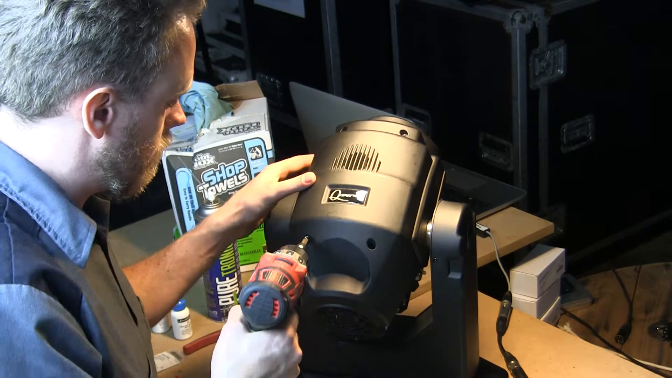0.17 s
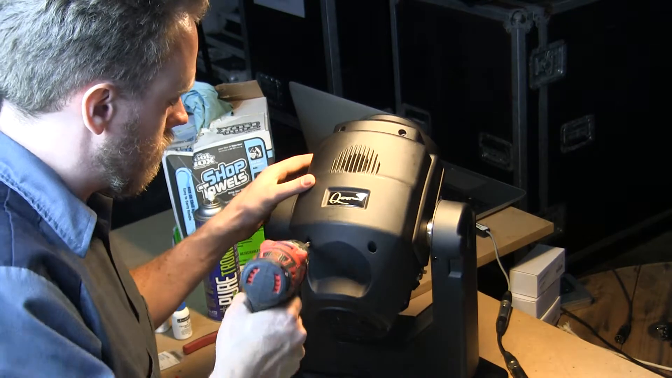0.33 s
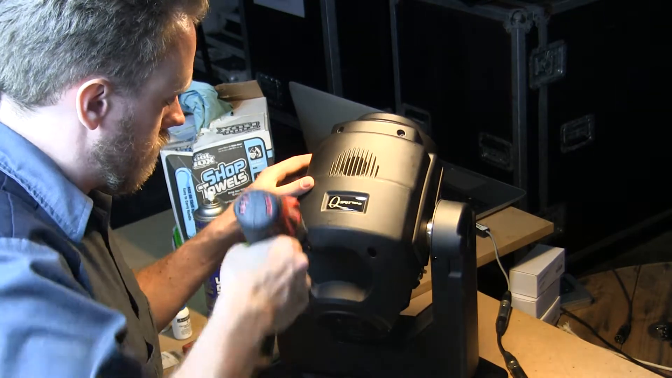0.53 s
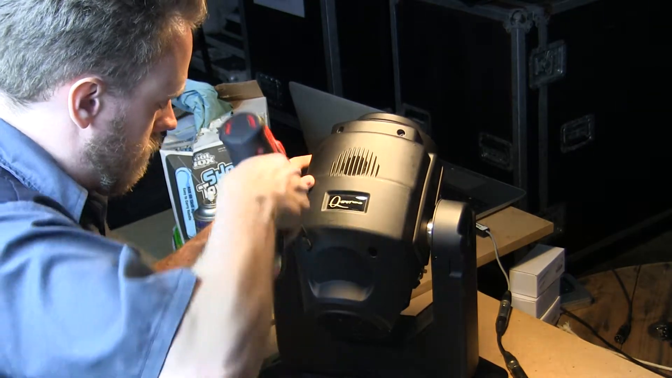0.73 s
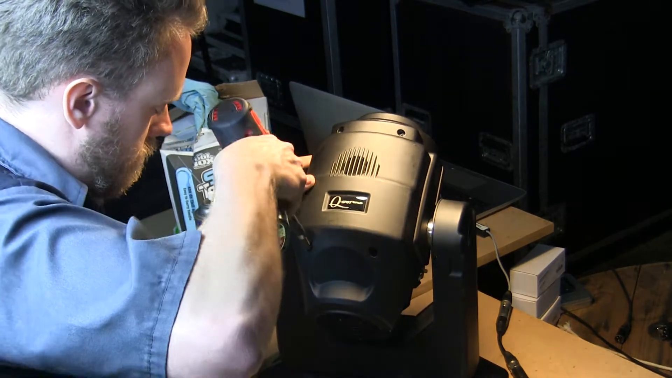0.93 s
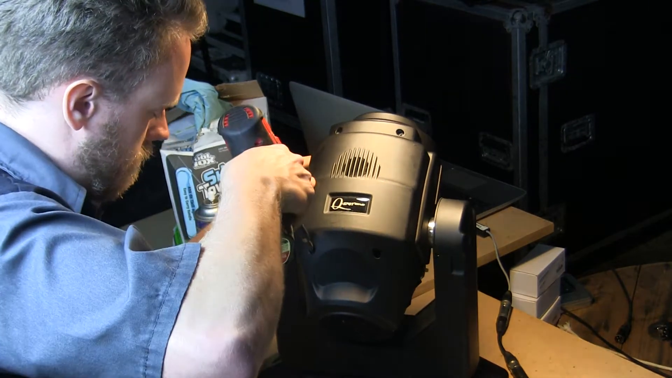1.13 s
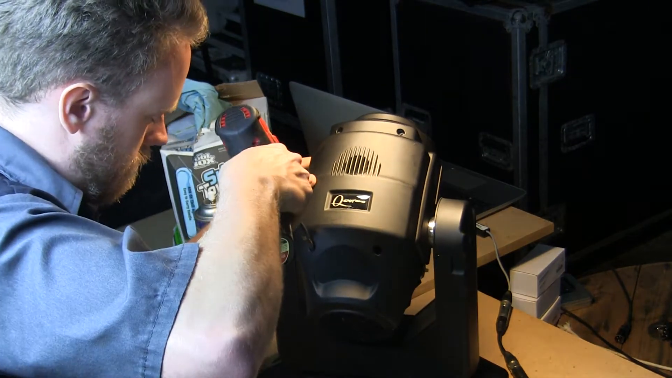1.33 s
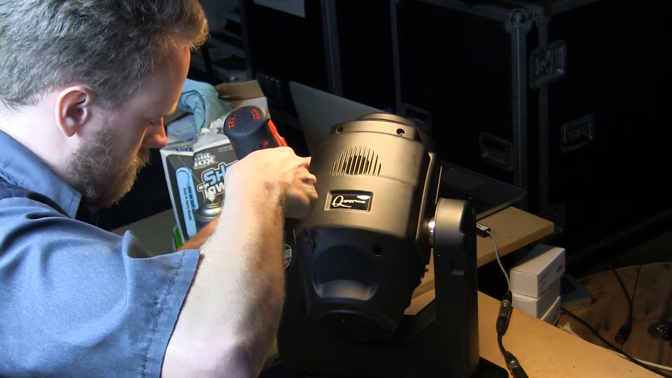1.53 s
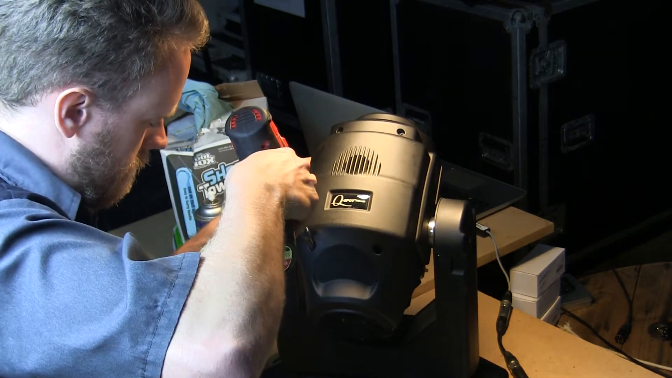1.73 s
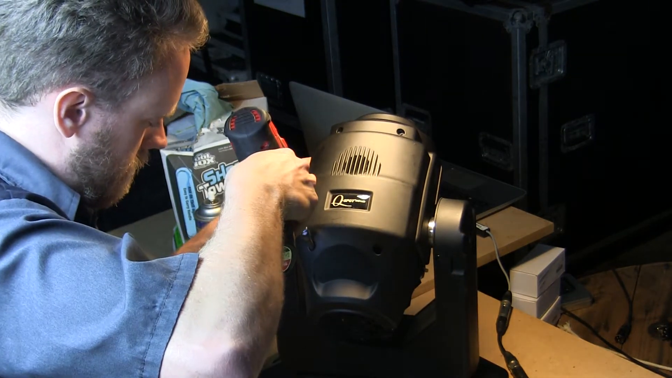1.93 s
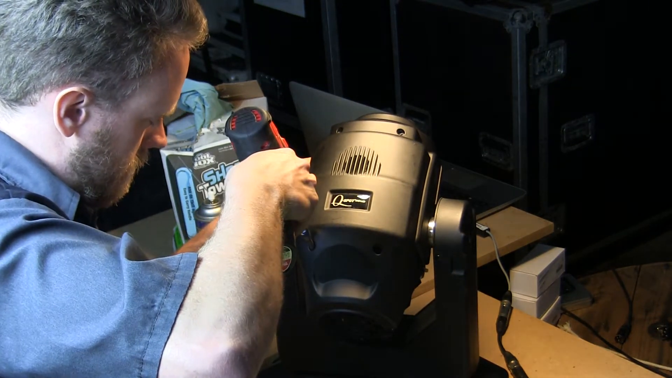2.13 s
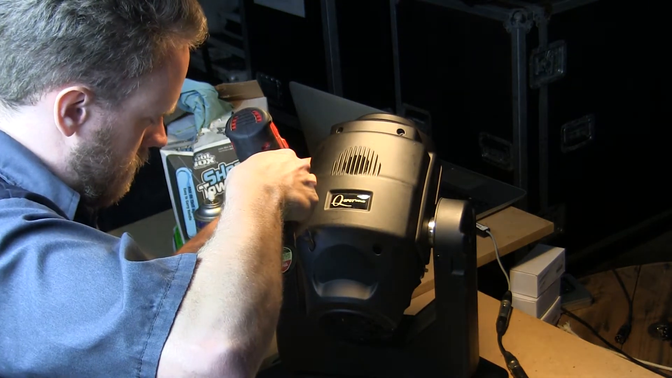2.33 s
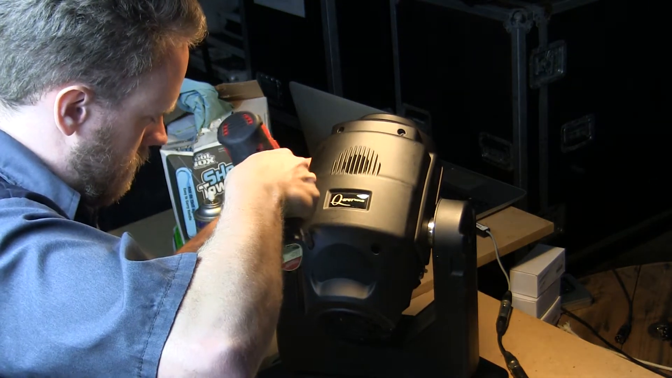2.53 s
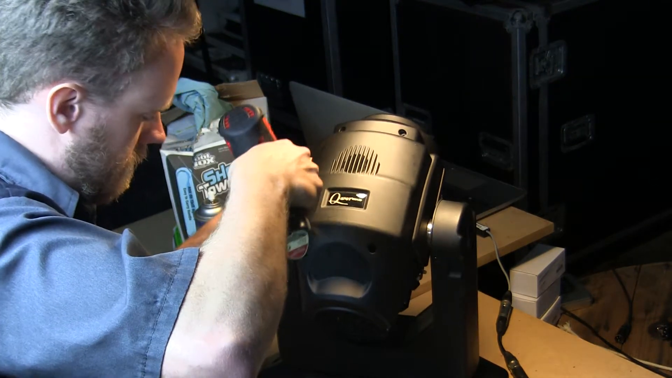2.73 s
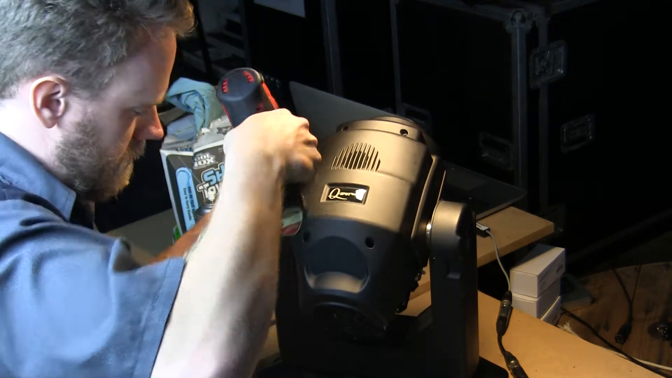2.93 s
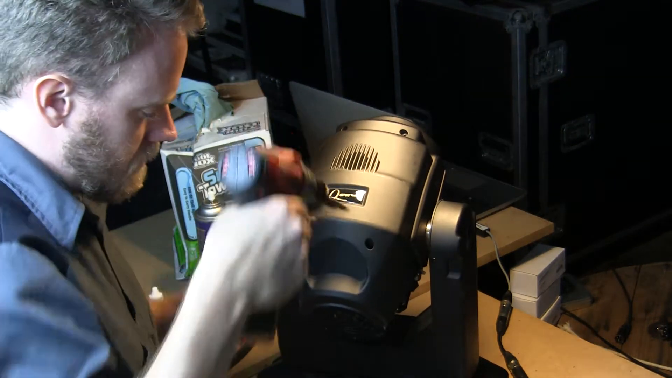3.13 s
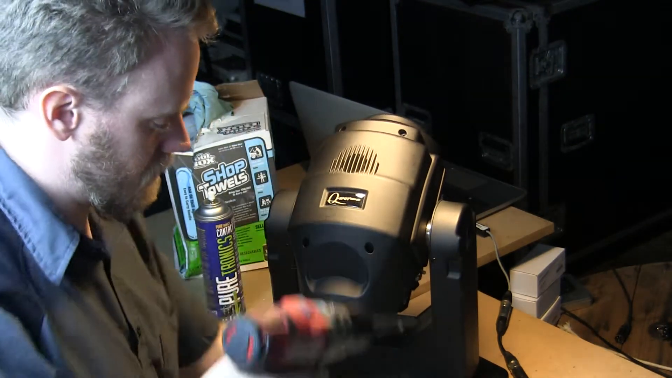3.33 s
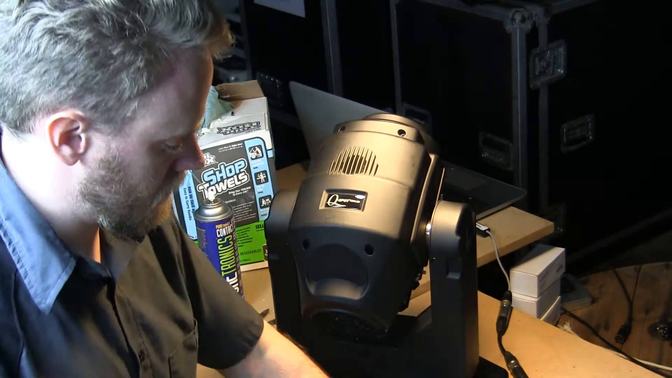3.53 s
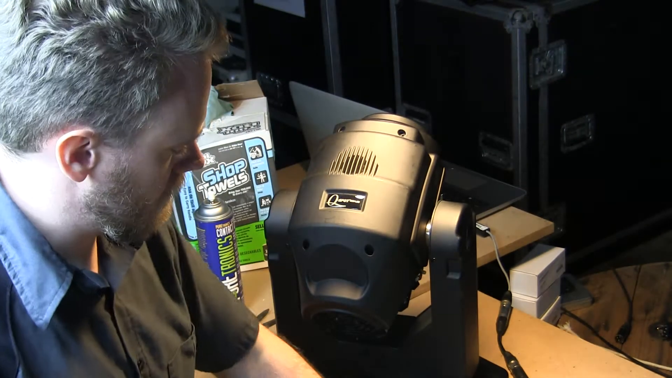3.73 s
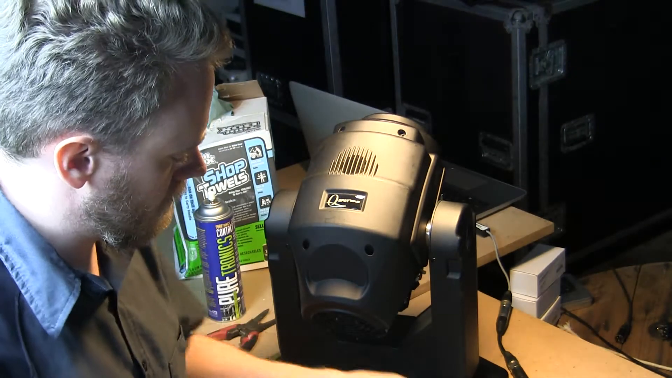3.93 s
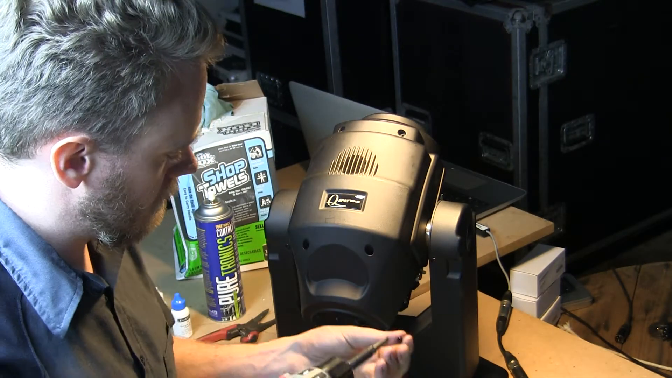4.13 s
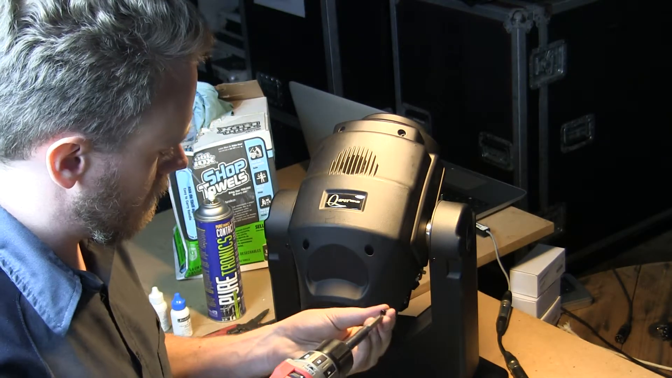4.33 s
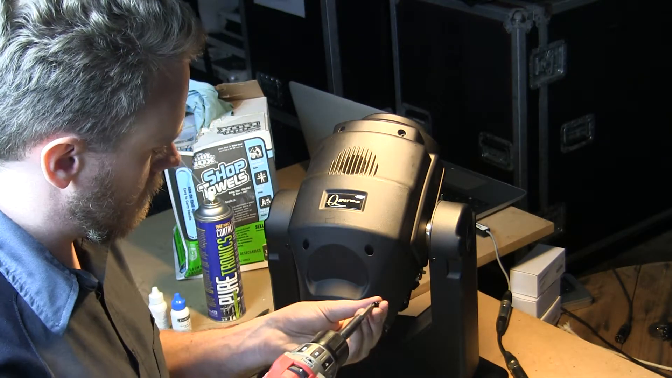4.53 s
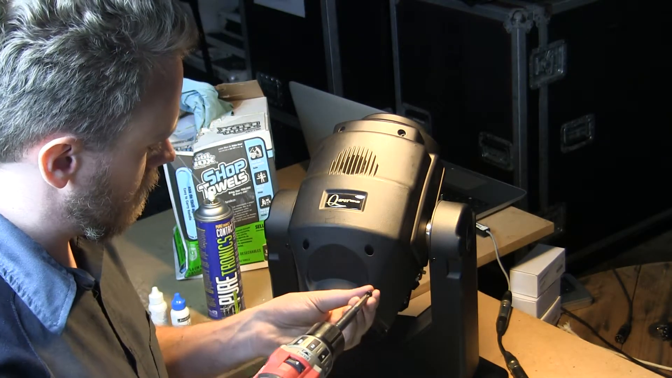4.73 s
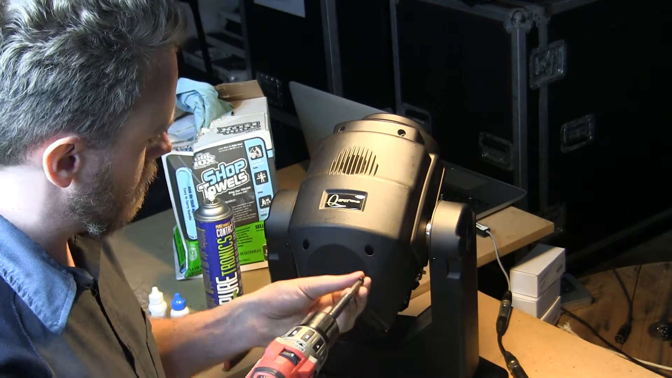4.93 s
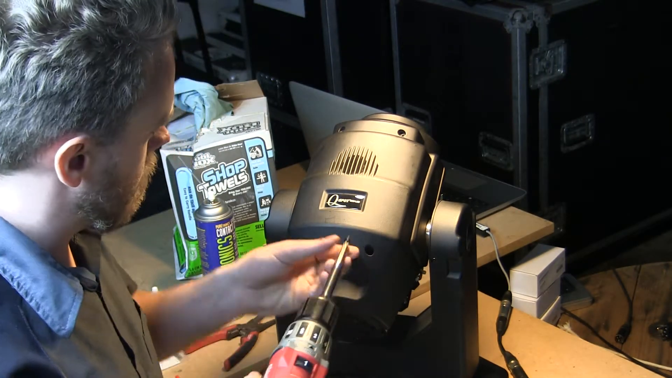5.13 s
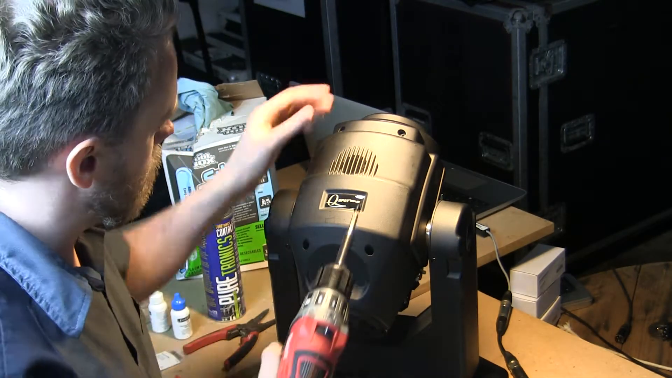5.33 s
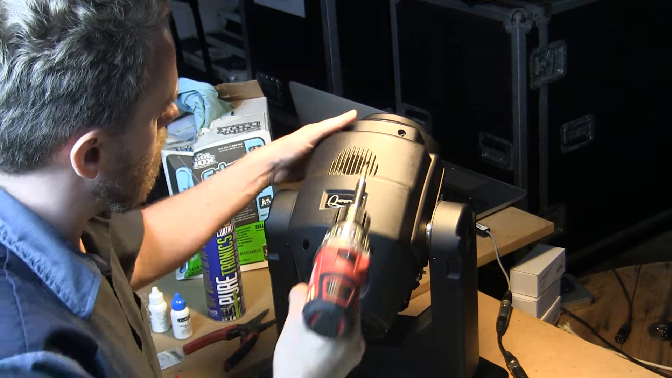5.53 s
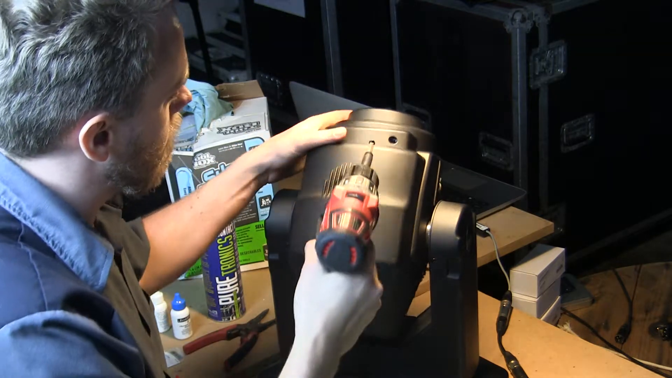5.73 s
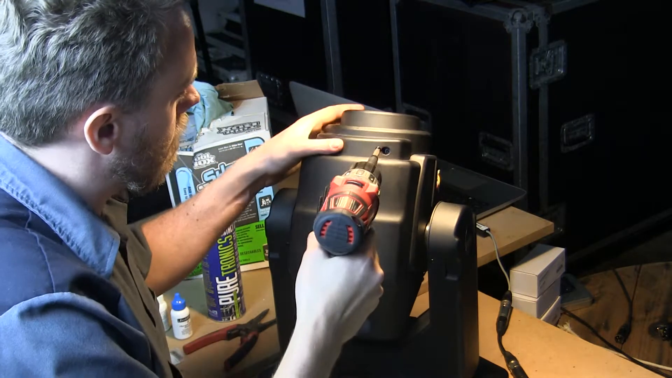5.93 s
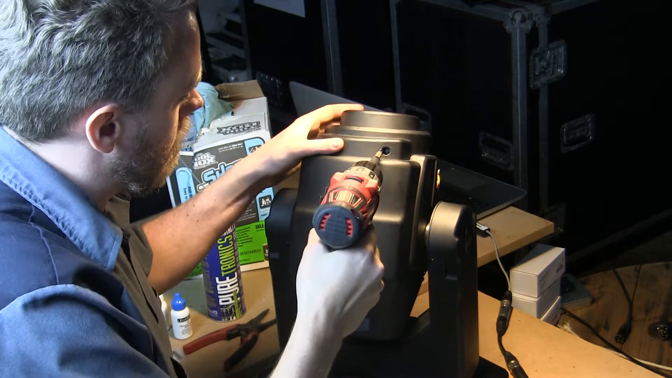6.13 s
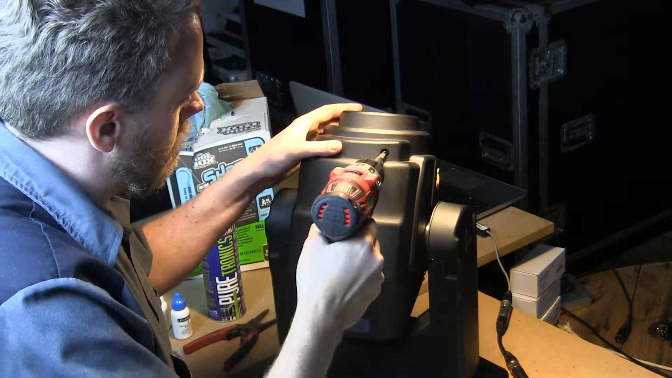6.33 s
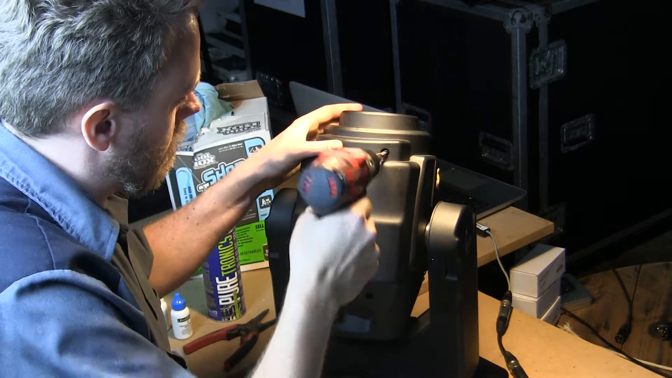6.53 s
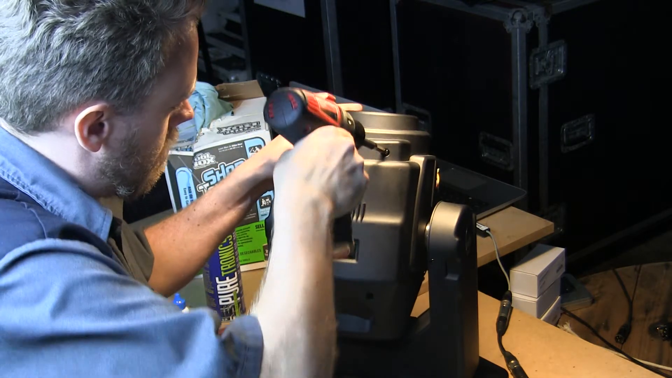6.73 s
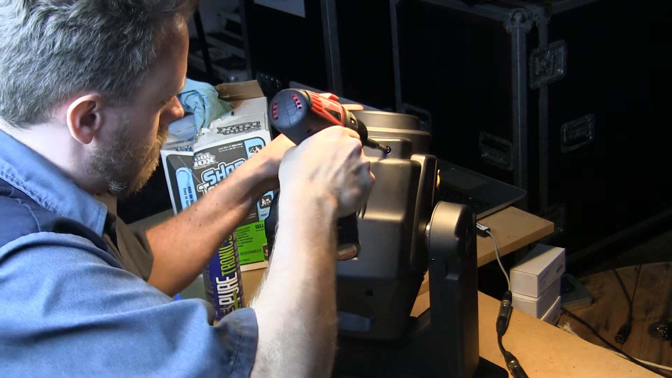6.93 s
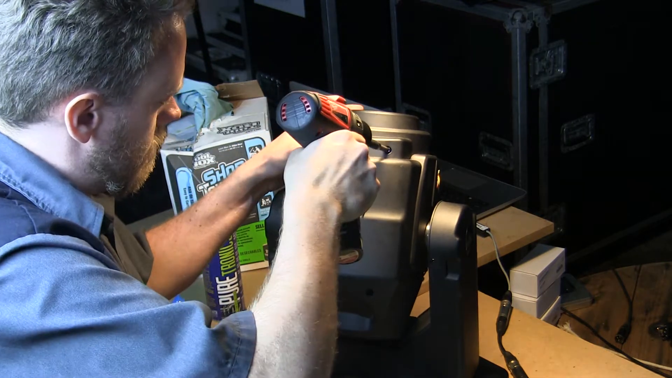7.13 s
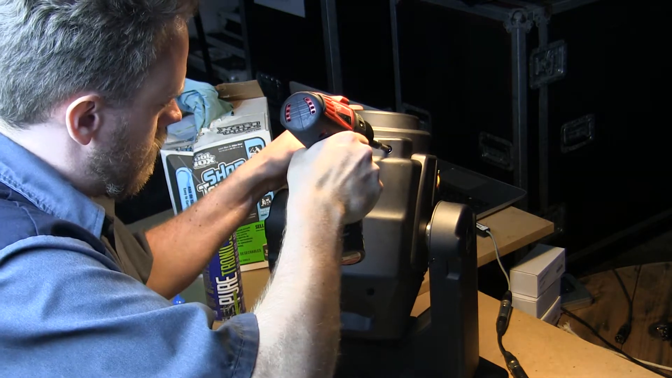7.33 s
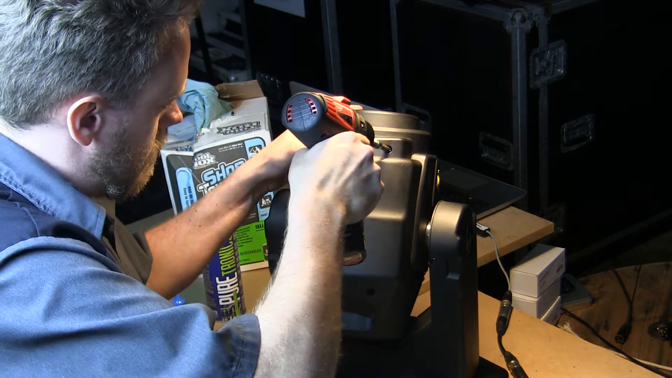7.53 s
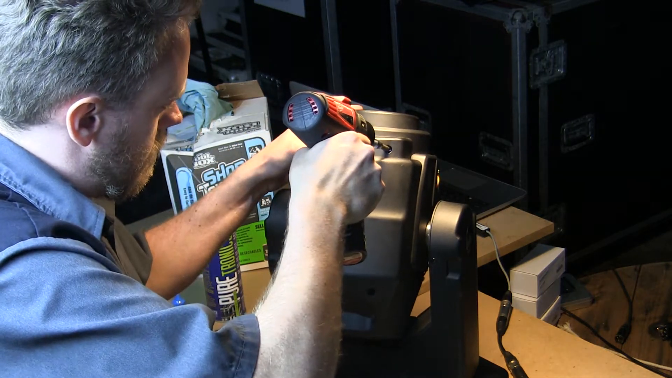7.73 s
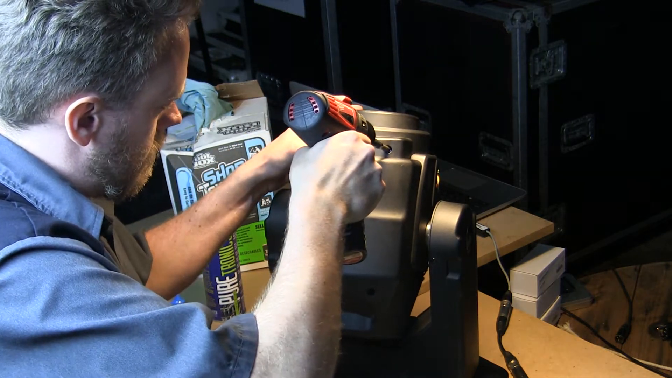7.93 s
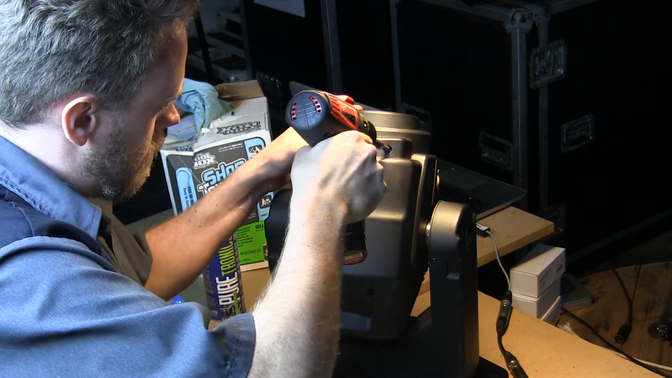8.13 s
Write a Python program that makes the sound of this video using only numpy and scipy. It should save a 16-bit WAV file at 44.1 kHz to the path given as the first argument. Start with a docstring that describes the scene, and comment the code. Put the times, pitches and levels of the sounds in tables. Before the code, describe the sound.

A close stereo microphone in a workshop hears soft room hum and drifting scuffs of movement. Faint knocks on a hollow plastic housing come around 0.4-0.8 s, with small ticks just before 1.2 s. A cordless drill then spins up almost instantly, with a brief electronic whistle, to a bright buzzing whine over airy whirr. From about 2.55 s its clutch slips, ratcheting nearly fifty clicks a second as the pitch sags slightly; it brakes abruptly near 2.8 s with last weak clicks. A double clack follows at 3.15 s, then dull wooden thumps and cloth rustles from 3.4 to 4 s. Quieter rustling continues until plastic knocks at 5.6-6.1 s and a sharper cluster at 6.6 s. At 6.9 s the drill whines up again, with firm knocks around 7.2-7.3 s, and runs steadily to the end. Short reverberation surrounds it.

```python
"""In a workshop, a cordless drill spins up twice near the microphone, and at the end of the first run its clutch ratchets.
The drill is multiples of its shaft speed over noise that throbs once a turn; each clutch slip is a ringing click.
Around the runs hands knock a plastic housing and set things down on a wooden bench: noisy pushes ring modes,
and low thumps also lend bass to the ratchet and the knocks. Puffs of noise rustle, noise shuffles and hums behind,
and scattered dying taps make the room's reverberation."""
import sys
import numpy as np
from scipy import signal
from scipy.io import wavfile
from scipy.ndimage import uniform_filter1d

SR = 44100
rng = np.random.default_rng(int(sys.argv[2]) if len(sys.argv) > 2 else 0)


def digitize_waveform(pressure):
    """Quantize a signal to 16-bit integers and store it at the path in sys.argv[1].

    Rows of a 2-D input are taken as channels; values are limited to [-1, 1].
    """
    field = np.atleast_2d(pressure).T
    bounded = np.clip(field, -1, 1)
    quanta = np.round(bounded * 32767).astype(np.int16)
    wavfile.write(sys.argv[1], SR, quanta)


N = 360738

# drill runs: trigger pulled t/s, let go t/s, relative whirr level/dB, treble shelf level/dB
RUN_TABLE = [(1.17, 2.763, -23, 0), (6.92, 9, -21.5, -2.5)]
# last clutch slips as the chuck coasts to rest: t/s, relative level/dB
COASTING_SLIPS = [(2.854, -9.5), (2.8853, -11)]
# modes of the plastic housing: f/Hz, width f/Hz, relative level/dB
HOUSING_MODES = [(305, 11, -7), (348, 36, -7.5), (443.5, 29, -3), (561, 130, 8.5), (724, 88, 2),
                 (938, 230, 7.5), (1295, 330, 7), (1890, 620, 5.5), (2880, 800, -4.5), (3700, 490, -14),
                 (5560, 2000, -13.5)]

PINION, RING = 24, 15  # multiples of the shaft at which the gears whine
FIRST_SLIP_S = 2.5597


def gain_of(db):
    """Decibels to amplitude."""
    return 10 ** (np.asarray(db) / 20)


def evened(x):
    """Scales to rms 1."""
    return x / np.sqrt(np.mean(x ** 2) + 1e-20)


def read(points, hz):
    """Reads a spectrum on a log-frequency axis."""
    f, value = np.transpose(points)
    return np.interp(np.log(hz + 1), np.log(f + 1), value)


def add(mix, s, sound):
    """Mixes a sound in at time s."""
    part = mix[..., round(s * SR):][..., :sound.shape[-1]]
    part += sound[..., :part.shape[-1]]


def wander(per_s, size):
    """Slow chance of about rms 1: random knots, smoothed twice; higher per_s drifts faster."""
    knots = rng.standard_normal(int(size / SR * 100) + 9)  # 100 a second
    width = max(round(50 / per_s), 1)
    smooth = uniform_filter1d(uniform_filter1d(knots, width), width)
    return np.interp(np.arange(size) * 100 / SR, np.arange(len(knots)), evened(smooth))


def hiss(spectrum, patchy_db):
    """Stereo noise of rms 1 with a given spectrum, drifting patches and partly shared left and right."""
    # left-right likeness: f/Hz, share (1 = same)
    likeness = [(60, 0.94), (500, 0.94), (1800, 1), (6000, 0.84)]
    frames, hz = N // 256 + 5, np.fft.rfftfreq(1024, 1 / SR)
    a, b, c, d, patches = rng.standard_normal((frames, 513, 5)).T
    patches = evened(uniform_filter1d(uniform_filter1d(patches, 10, 0), 10, 1))
    same = np.clip(read(likeness, hz), -1, 1)[:, None]
    left = a + 1j * b
    right = same * left + np.sqrt(1 - same ** 2) * (c + 1j * d)
    z = np.array([left, right]) * gain_of(read(spectrum, hz)[:, None] + patchy_db * patches)
    return evened(signal.istft(z, nperseg=1024, noverlap=768)[1][:, :N])


def blow(modes, db, hard_db, rattle_s, low_hz, rise_s, crack=3.9, high_hz=10000):
    """A push and rattle ring a body; hardness (dB/octave) favours upper modes, a slow rise has less crack."""
    t = np.arange(SR // 3) / SR
    hz, width, mode_db = np.transpose(modes)[:, :, None]
    spot, shift = rng.standard_normal((2, len(modes), 1))  # each blow lands elsewhere
    level = np.sqrt(width) * gain_of(mode_db + 1.2 * spot + hard_db * np.log2(hz / 700))
    ringing = np.exp(-np.pi * width * t) * np.sin(2 * np.pi * hz * (1 + 0.011 * shift) * t)
    body = (level * ringing).sum(0)
    rise_s = max(rise_s, 1 / 1500)
    rattle = (1 - np.exp(-t / rise_s)) * np.exp(-t / max(rattle_s, .001))
    sharp = crack / (1500 * rise_s) * gain_of(min(hard_db, 0)) * np.exp(-t / 0.0011)
    push = rng.standard_normal(len(t)) * (rattle + sharp)
    band = signal.butter(3, [low_hz, high_hz], "band", fs=SR)
    out = signal.lfilter(*band, signal.fftconvolve(push, body)[:len(t)])
    return gain_of(db) * out / abs(out).max()


def shell_db(hz):
    """The drill shell lifts whatever passes its resonances."""
    # shell resonances: f/Hz, width f/Hz, lift level/dB
    resonances = [(690, 160, 26), (7700, 600, 17), (11800, 900, 9)]
    return sum(db / (1 + ((hz - f) / width) ** 2) for f, width, db in resonances)


def orders(own_db):
    """Relative levels of the shaft multiples; the armature slots lift every third."""
    # multiples of the shaft with a level of their own, some loud, some faint: multiple (a count)
    own_level = [3, 6, 7, 9, 12, 20, 21, 22, 23, 32, 36, 39, 40, 45]
    k = np.arange(1, 50)
    db = np.where(k < RING + 3, -31, -24.5) + 4.5 * (k % 3 == 0)
    db = db + 1.5 * rng.standard_normal(len(k))
    db[np.array(own_level) - 1] = own_db
    return db


def drill(run, own_db, air):
    """Multiples of the shaft speed sing over a whirr that throbs once a turn."""
    # gear whines, flaring through resonances and as the drill is tilted and loaded:
    # t/s, pinion level/dB, ring gear level/dB
    whines = [(1.2, -60, -59), (1.27, -37, -41), (1.31, -35, -34), (1.36, -34, -38), (1.4, -20.5, -33),
              (1.43, -32, -48), (1.48, -19, -33), (1.52, -38, -38), (1.59, -26.5, -32), (2.1, -24.5, -28.5),
              (2.35, -25, -33.5), (2.5, -32, -36), (2.54, -25, -34), (2.73, -29.5, -34), (6.96, -58, -61),
              (7.05, -35, -40), (7.09, -36, -37), (7.13, -17, -43), (7.16, -31, -42), (7.2, -29, -37),
              (7.29, -23, -30), (7.35, -23, -36), (7.62, -27, -37.5), (8.0, -21.5, -32), (8.18, -30, -31)]
    # free speed of the motor shaft, sagging under load: t/s, f/Hz
    shaft = [(1.6, 315), (2.3, 314.5), (2.53, 313.3), (2.6, 304.2), (2.8, 305), (7.3, 315.6), (7.6, 315.7),
             (8.18, 314.8)]
    spin_up_s, already_turning_s = .062, .005  # time constant; the shaft moves when first heard
    quiet_start_db, swell_s = -12.5, 0.045
    brake_db_per_s, whine_cut_db_per_s = 212, 502  # the cut adds to the brake: whines stop with the current
    pulled, let_go, run_db, treble_db = run
    t = np.arange(pulled, min(let_go + 0.25, N / SR), 1 / SR)
    size = len(t)

    speed = 1 - np.exp(-(t - pulled + already_turning_s) / spin_up_s)
    hz = np.interp(t, *np.transpose(shaft)) * speed
    since_let_go = np.maximum(t - let_go, 0)
    braked = gain_of(-brake_db_per_s * since_let_go) * np.minimum((t - pulled) / 0.019, 1)
    slipping = np.clip((t - FIRST_SLIP_S) / 0.04 + 1, 0, 1) * (t < COASTING_SLIPS[-1][0] + 1)
    swell = np.exp(-((t - pulled) / swell_s) ** 2)
    whirr_db = run_db + quiet_start_db * swell + 6 * slipping

    broken_db = np.minimum(10 * np.sqrt(1 - speed), 5.0)  # tones break up below full speed
    cut_db = whine_cut_db_per_s * since_let_go
    s, *columns = np.transpose(whines)
    pinion_db, ring_db = (np.interp(t, s, c) for c in columns)
    pinion_db = pinion_db + (2.6 * slipping + 0.28 * broken_db) * wander(30, size) - cut_db
    ring_db = ring_db + 1.66 * wander(12, size) - cut_db
    ring_db = ring_db - 4.5 * slipping + .4 * broken_db * wander(30, size)

    unsteady = (0.00034 + .004 * slipping) * wander(40, size)  # the slipping clutch jolts the shaft
    turn = 2 * np.pi * np.cumsum(hz * (1 + unsteady)) / SR
    blurred_db = 9.0 * slipping + 56 * (1 - hz / hz.max())  # tones stand out only at a steady speed
    lines = np.zeros((2, size))
    for k, db in enumerate(orders(own_db), 1):
        lift_db = np.repeat(shell_db(k * hz[::64]) - shell_db(k * hz.max()), 64)[:size]
        level_db = whirr_db - 3.5 + db + lift_db
        level_db = level_db + 1.85 * wander(6.6, size) + 1.9 * wander(25, size)
        level_db = level_db - broken_db * abs(wander(30, size)) - blurred_db * min(k / 10, 1)
        level_db = {PINION: pinion_db, RING: ring_db}.get(k, level_db)
        phase = rng.uniform(0, 2 * np.pi) + 0.02 * rng.standard_normal((2, 1))
        pan_db = np.array([[1], [-1]]) * (1.3 if k == RING else .5 * rng.standard_normal())
        lines += np.sqrt(2) * gain_of(level_db + pan_db) * np.cos(k * turn + phase)

    start = round(pulled * SR)
    whirr = air[:, start:start + size]
    treble = signal.lfilter(*signal.butter(1, 4000, "high", fs=SR), whirr)
    treble_db = treble_db - 6.0 * swell  # the fan's hiss wakes last
    whirr = (whirr + (gain_of(treble_db) - 1) * treble) * (1 + 0.12 * np.cos(turn))
    return pulled, (lines + gain_of(whirr_db - 2.5) * whirr) * braked * gain_of([[.7], [-.7]])


def drill_runs():
    """Both runs of the drill, drawing on one noise of fan, brushes and gears."""
    # whirr of fan, brushes and gears: f/Hz, relative level/dB per Hz
    whirr_spectrum = [(90, -59), (200, -23), (320, -14), (840, -12), (1900, -3.5), (2600, -5.5),
                      (4200, -13.5), (6000, -10.5), (7500, -11.5), (9500, -19.5), (11800, -14),
                      (14000, -24), (16000, -24)]
    # multiples with a level of their own, one row a run as the drill faces another way: level/dB in each column
    own_levels = [
        [-16, -8, -15, -10, -16, -21, -15, -12, -16, -24, -8, -21, -18, -18],
        [-18, -16, -14, -7, -12, -10, -14, -12, -15, -18, -10, -13, -30, -20],
    ]
    motor, air = np.zeros((2, N)), hiss(whirr_spectrum, patchy_db=1.0)
    for run, own_db in zip(RUN_TABLE, own_levels):
        add(motor, *drill(run, own_db, air))
    return motor


def switch():
    """The half-pulled trigger whistles: the speed control chops the current at a steady rate."""
    t = np.arange(SR // 8) / SR
    level = np.minimum(t / 0.004, 1) * gain_of(-27 - 350 * t)  # 4 ms rise, 350 dB/s fade
    return level * np.sin(2 * np.pi * 1880 * t)


def click(db):
    """One tooth drops: the clutch modes ring cleanly, a little detuned each time."""
    # clutch modes: f/Hz, width f/Hz, relative level/dB, later start t/s
    clutch = [(3050, 300, 0, 0), (1750, 160, 0, .0012), (5500, 600, -14, 0)]
    t = np.arange(SR // 50) / SR
    hz, width, mode_db, late_s = np.transpose(clutch)[:, :, None]
    spot, shift = rng.standard_normal((2, len(clutch), 1))
    u = np.maximum(t - late_s, 0)
    shape = (1 - np.exp(-u / .0005)) * np.exp(-np.pi * width * u)
    ringing = shape * np.sin(2 * np.pi * hz * (1 + 0.038 * shift) * u)
    return (gain_of(db + mode_db + 1.8 * spot) * ringing).sum(0)


def ratchet():
    """Each slip clicks the clutch and shakes the housing through the screw, weaker once the trigger is let go."""
    slips, gap_s, jitter_s = 12, .02125, .0004
    fade_db_per_s = 198
    out = np.zeros(N)
    at = FIRST_SLIP_S + gap_s * np.arange(slips) + jitter_s * rng.standard_normal(slips)
    level_db = 0.2 - fade_db_per_s * np.maximum(at - RUN_TABLE[0][1], 0)
    for s, db in [*zip(at, level_db), *COASTING_SLIPS]:
        add(out, s, click(db - 5.0))
        add(out, s, blow(HOUSING_MODES, db - 11.5, -9.0, 0.022, 230, 0.0038, crack=0.4))
    return out


def clacks(hits):
    """The drill's case clacks as it is pulled away: short blows ring the case."""
    # clacks: t/s, peak level/dB, hardness level/dB per octave, rattle t/s, rise t/s
    clack_times = [(3.143, -2.5, 3, 0.014, 0.00099), (3.161, -8, 4, 0.032, .004)]
    # modes of the drill's case: f/Hz, width f/Hz, relative level/dB
    case = [(576, 110, -6), (745, 240, 7.5), (980, 300, -3.5), (1430, 760, -5), (2110, 320, -3),
            (2870, 660, -16), (3700, 480, -20), (8720, 5400, -18)]
    for s, *how, rise_s in clack_times:
        add(hits, s, blow(case, *how, 526, rise_s, high_hz=7000))


def knocks(hits):
    """Hands knock the plastic housing; each blow has its own hardness, rattle and rise."""
    # blows: t/s, peak level/dB, hardness level/dB per octave, rattle t/s, lowest ringing f/Hz,
    # rise t/s (blow() allows no less than 1/1500 s)
    housing_blows = [(0.364, -26.5, -3, 0.019, 305, .006), (.484, -22, -3, 0.016, 513, .001),
                     (.53, -29.5, -10, 0.06, 200, .004), (.776, -18, -6.5, 0.028, 200, 0.0076),
                     (5.59, -26, -13, 0.023, 400, 0.0018), (5.742, -15.5, -8, 0.022, 305, 0.00088),
                     (6.078, -13.5, -6.5, 0.03, 180, 0.00055), (6.612, -11, 4.5, 0.008, 344, 0.001),
                     (6.621, -16.5, 0.5, 0.013, 350, 0.0018), (6.642, -17.5, -4.5, 0.017, 347, .014),
                     (6.674, -20.5, -12, 0.02, 292, 0.00063), (6.725, -25, -3, 0.014, 500, 0.0069),
                     (7.215, -12, 4, 0.045, 234, .002), (7.238, -12, -6.5, 0.038, 348, 0.00052),
                     (7.298, -7.5, -6, 0.043, 413, 0.00052)]
    for s, *how in housing_blows:
        add(hits, s, blow(HOUSING_MODES, *how))


def thumps(hits):
    """Low thumps: things set down on the bench, and the bass push under the ratchet and the housing knocks."""
    # thumps: t/s, peak level/dB
    low_blows = [(3.419, -14), (3.448, -19), (3.638, -19.5), (3.68, -26), (3.772, -18), (3.81, -27),
                 (3.94, -24.5), (4.03, -23.5), (2.563, -20), (2.761, -19.5), (7.019, -28.5), (7.215, -13),
                 (7.329, -18), (7.63, -22.5)]
    # modes of the bench, rung by every thump: f/Hz, width f/Hz, relative level/dB
    bench = [(69.5, 48, -30), (137, 9.2, -2), (194, 26, -4), (266, 7.2, -5.5), (335, 54, 3.5),
             (525, 55, 0.5), (716, 35, -1.5), (1000, 500, 4.5), (1960, 1100, -4)]
    for s, db in low_blows:
        add(hits, s, blow(bench, db, 0, 0.03, 75, 0.0019, crack=1.0))


def rustles():
    """Brushes of cloth and small ticks: puffs of wide treble noise with a soft start."""
    # puffs: t/s, noise level/dB rms before the rise and decay, decay t/s
    puffs = [(0.758, -46.5, 0.019), (1.109, -44, 0.0055), (1.152, -46, 0.011), (3.41, -40.5, 0.052),
             (3.656, -42.5, 0.054), (3.805, -46, 0.049), (3.945, -44, 0.094), (4.181, -43.5, 0.05),
             (4.59, -45.5, 0.08), (4.737, -47, .015), (5.156, -50.5, 0.048), (6.124, -50.5, 0.046),
             (6.866, -43.5, 0.0073), (6.915, -44, 0.032)]
    band = signal.butter(1, [3000, 11000], "band", fs=SR)
    out = np.zeros(N)
    for s, db, length in puffs:
        u = np.arange(SR // 4) / SR / max(length, .003)
        puff = evened(signal.lfilter(*band, rng.standard_normal(len(u))))
        add(out, s, gain_of(db) * puff * np.minimum(u * 2.0, 1) * np.exp(-u))
    return out


def shuffle():
    """Hands and feet moving about: scuffing noise whose level drifts."""
    # movement: t/s, level/dB
    movement = [(0, -46.5), (.55, -41), (1.15, -44), (3, -41), (4, -39.5), (4.5, -40.5), (5.2, -44),
                (6.9, -42)]
    # scuffing: f/Hz, relative level/dB per Hz
    scuff = [(25, -42), (100, -25.5), (135, 5.5), (170, -12.5), (260, 2), (1000, -6), (3000, -17.5),
             (16000, -50)]
    t = np.arange(N) / SR
    moving = gain_of(np.interp(t, *np.transpose(movement)) + 1.8 * wander(10, N))
    return moving * hiss(scuff, patchy_db=1.5)


def room_air():
    """The hum of the room: steady noise, mostly below the treble."""
    # room air: f/Hz, relative level/dB per Hz
    hum = [(15, -37), (50, -2), (110, -9.5), (160, -22), (195, -13), (215, -37), (300, -1.5), (900, -2),
           (1300, 3.5), (2200, -6.5), (3500, -20), (16000, -35)]
    return gain_of(-42) * hiss(hum, patchy_db=.7)


def shop(x):
    """Reverberation: sparse taps of random sign, each band dying at its own speed."""
    # reverberation of the workshop: f/Hz, time to fall 60 dB t/s
    decay_times = [(100, 0.51), (500, 0.44), (2000, 0.62), (8000, 0.56)]
    taps = np.zeros((2, SR))
    at = np.arange(300, SR - 20, 20) + rng.integers(0, 20, (1, (SR - 301) // 20))
    signs = rng.choice([-1., 1.], at.shape)
    taps[:, at[0]] = signs * (1 + 0.37 * rng.standard_normal((2, at.shape[1])))
    hz, t, z = signal.stft(taps, SR, nperseg=256)
    dying = gain_of(-60 * t / read(decay_times, hz)[:, None])
    tail = signal.istft(z * dying, SR, nperseg=256)[1]
    return signal.fftconvolve(x[None], tail / np.linalg.norm(tail[0]), axes=1)[:, :N]


def scene():
    """Drill, clutch and handling in the shop, over the room air."""
    motor, slips, hits = drill_runs(), ratchet(), np.zeros(N)
    add(hits, 1.164, switch())
    clacks(hits)
    knocks(hits)
    thumps(hits)
    near = motor + hits + slips + rustles()
    far_motor = gain_of(-16) * motor.mean(0)
    far_slips = gain_of(-9) * slips
    wet = shop(far_motor + far_slips + gain_of(-4.0) * hits)
    return near + wet + room_air() + shuffle()


def record(dry):
    """The microphone drops the deep bass, its right port a little less; then a 15.75 kHz band limit."""
    thin = signal.lfilter(*signal.butter(2, 45, "high", fs=SR), dry)
    bass = signal.lfilter(*signal.butter(1, 220, fs=SR), thin)
    thin = thin + np.array([[-.12], [.12]]) * bass
    band_limit = signal.firwin(511, 15750, window=("kaiser", 9), fs=SR)
    return signal.oaconvolve(thin, band_limit[None], "same")


dry = scene()
out = record(dry)
digitize_waveform(out)
```